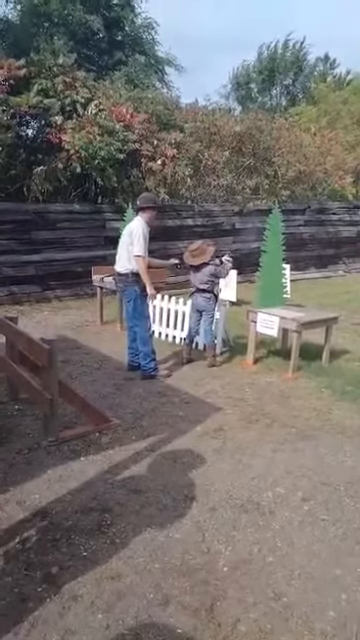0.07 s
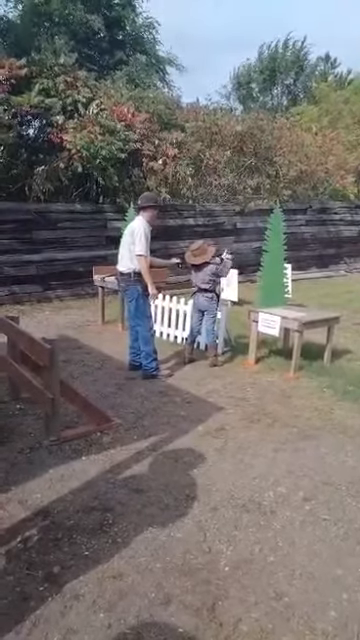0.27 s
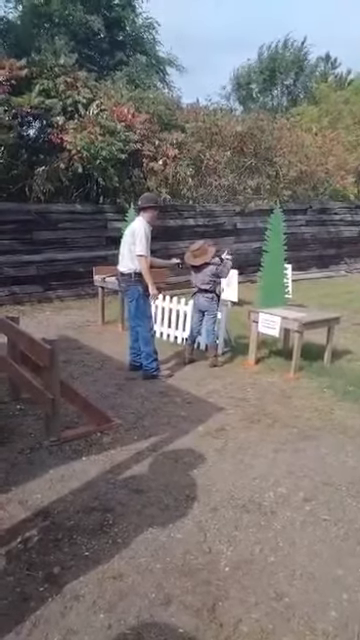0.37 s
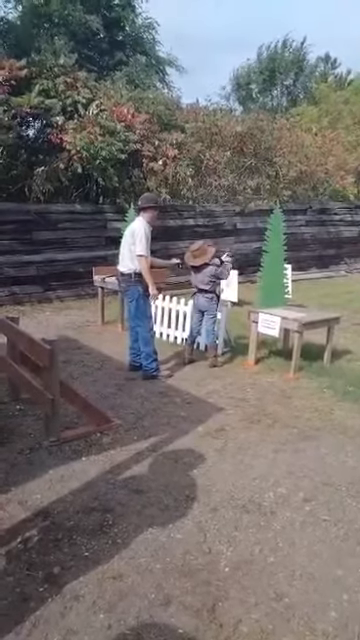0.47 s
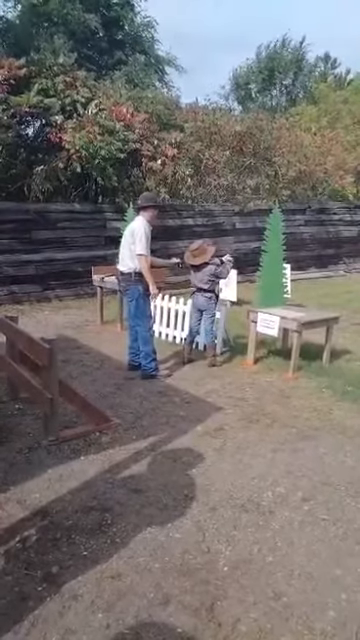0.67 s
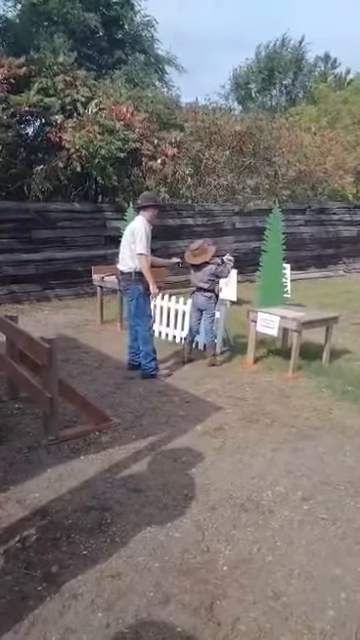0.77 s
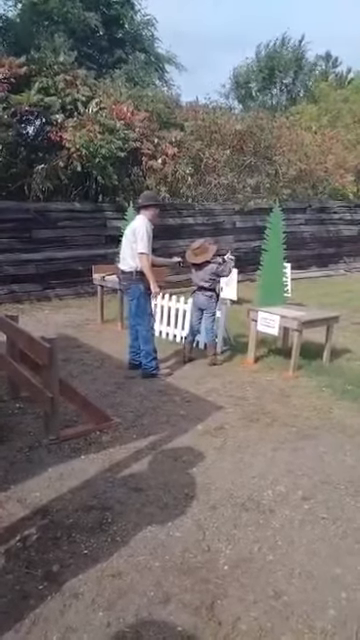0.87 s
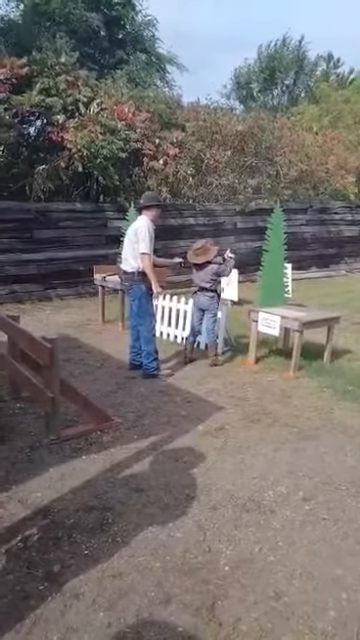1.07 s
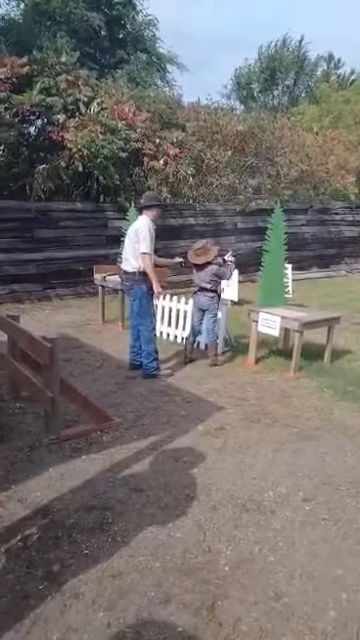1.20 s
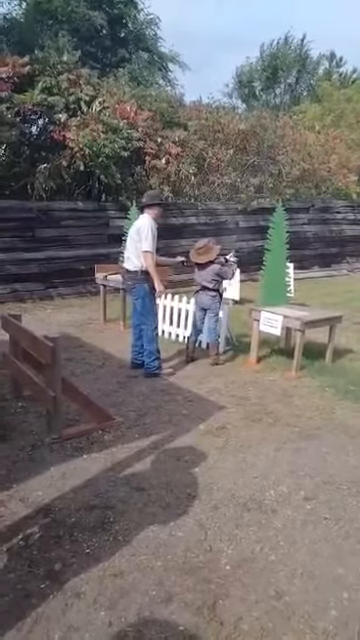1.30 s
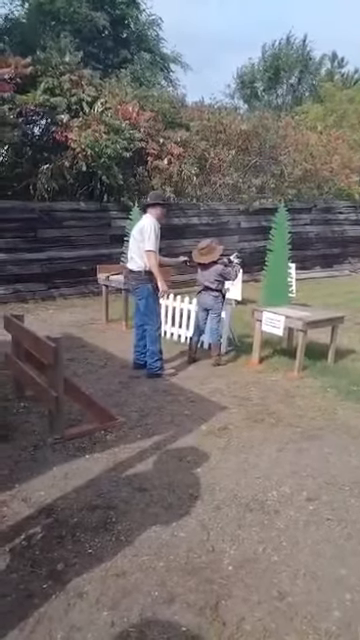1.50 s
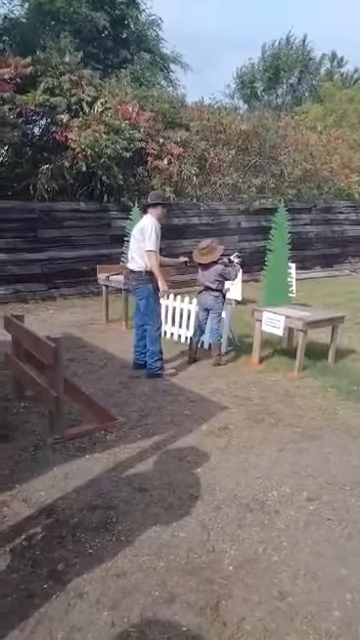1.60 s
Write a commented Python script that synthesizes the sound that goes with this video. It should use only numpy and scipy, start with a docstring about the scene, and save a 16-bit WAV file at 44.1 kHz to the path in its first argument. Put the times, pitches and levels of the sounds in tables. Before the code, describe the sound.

Revolver fires twice at an outdoor range, bullets ringing a steel plate, echoes rolling off quickly

```python
"""Two revolver shots at an outdoor range, heard from a few metres behind the shooter: shaped noise bursts.
Each blast slaps back from a timber wall, rolls away among fences and trees as grainy noise, and returns in dull booms.
Each bullet clangs a steel plate: a noise splash, decaying sine modes and a wash of close upper sines. The lowest
modes still sing from the hit before. The dying tail of an earlier shot, faint far-off reports and open air are
coloured noise. The loudest peaks overload the microphone."""
import sys
import numpy as np
from scipy import signal
from scipy.fft import rfft, irfft
from scipy.io import wavfile
from scipy.ndimage import uniform_filter1d

SR = 44100
rng = np.random.default_rng(int(sys.argv[2]) if len(sys.argv) > 2 else 0)


def waveform_to_disk(signal):
    """Save audio, clipped to [-1, 1], as 16-bit WAV at the path in sys.argv[1]."""
    frames = np.transpose(np.atleast_2d(signal))
    scaled = np.clip(frames, -1, 1) * 32767
    samples = np.round(scaled).astype(np.int16)
    wavfile.write(sys.argv[1], SR, samples)


N = 72765

# The two shots, with level offsets for each layer:
# (time [s], blast level [dB], reverberation and echo level [dB], plate splash and shimmer level [dB])
SHOT_TABLE = [(0.2116, 3, 1, 8.5), (0.9673, 3, 1, 5.5)]
FLIGHT_S = 0.019  # from the shot to its clang
RING_RISE_S = 0.022  # attack of the ringing steel


def undb(db):
    """Decibels to gain."""
    return 10 ** (np.asarray(db) / 20)


def along(points, hz):
    """Read (frequency [Hz], value) points on a log-frequency axis."""
    p = np.array(points, float)
    return np.interp(np.log(np.maximum(hz, 1)), np.log(p[:, 0]), p[:, 1])


def noise(spectrum, likeness):
    """Stereo noise of rms 1 with a given colour and likeness between the ears, growing alike in the bass."""
    bass_alike_hz = 90
    hz = np.fft.rfftfreq(N, 1 / SR)
    alike = np.clip(likeness, -1, 1)
    alike = alike + (1 - alike) / (1 + (hz / bass_alike_hz) ** 2)
    mid, side = rfft(rng.standard_normal((2, N)))
    common = np.sqrt(1 + alike) * mid
    opposed = np.sqrt(np.maximum(1 - alike, 0)) * side * np.array([[1], [-1]])
    y = irfft((common + opposed) * undb(along(spectrum, hz)), N)
    return y / y.std()


def walk(rate):
    """Smoothed random drift for each ear, spread 1; a higher rate [Hz] moves faster."""
    k = max(int(SR / rate), 1)
    y = uniform_filter1d(uniform_filter1d(rng.standard_normal((2, N)), k), k)
    return y / y.std()


def since(start):
    """Seconds since a moment."""
    return np.arange(N) / SR - start


def envelope(age, rise, hold, t60):
    """Straight attack, then exponential release from the end of the hold; all times from age zero [s]."""
    return np.clip(age / rise, 0, 1) * np.exp(-np.log(1000) * np.maximum(age - hold, 0) / t60)


def swell(age, width):
    """A bell-shaped bump around age zero."""
    return np.exp(-.5 * (age / width) ** 2)


def blasts():
    """The muzzle blast with its nearest reflections, then the dull slap of the wall; both shots take the same paths."""
    # Colour of the muzzle blast: (frequency [Hz], relative level [dB])
    blast_colour = [(25, 1.5), (60, -16), (130, 0), (330, -1.5), (530, 4.5), (670, 6), (950, -27.5),
                    (1200, 4.5), (1700, -1.5), (3000, -4.5), (4500, -13), (8000, -16), (10000, -23.5),
                    (13000, -41)]
    # Colour of the wall's reflection: (frequency [Hz], relative level [dB])
    wall_colour = [(30, -10), (150, -10), (400, -10), (530, -7.5), (640, -2.5), (780, -2), (920, 9.5),
                   (1200, -24), (2000, -24.5), (8000, -37)]
    # Levels ahead of each shot's own offset
    blast_db, blast_hold_s, blast_t60_s, blast_likeness = -8.5, 0.011, 0.12, 0.13
    wall_db, wall_delay_s, wall_width_s, wall_likeness = -7, 0.01785, 0.0024, 0.47

    age = since(0)
    crack = noise(blast_colour, blast_likeness) * envelope(age, 0.0017, blast_hold_s, blast_t60_s)
    slap = noise(wall_colour, wall_likeness) * swell(age - wall_delay_s, wall_width_s)
    shot = undb(blast_db) * crack + undb(wall_db) * slap
    out = 0
    for start, db, _, _ in SHOT_TABLE:
        placed = np.roll(shot, int(start * SR), axis=1) * (since(start) > 0)
        out = out + undb(db) * placed
    return out


def reverberation():
    """Dense, grainy scatter from fences and trees, each frequency band dying at its own rate."""
    # Colour of the scatter: (frequency [Hz], relative level [dB])
    tail_colour = [(25, -10), (60, -30.5), (140, -1.5), (280, 0.5), (450, -0.5), (800, 3), (1300, -4.5),
                   (2000, -4.5), (3100, -6.5), (4400, -14), (6000, -13), (8200, -14), (9200, -27),
                   (11200, -30.5), (12800, -35.5)]
    # Decay of the scatter: (band centre [Hz], time to fall 60 dB [s])
    tail_decay = [(40, .33), (150, 0.63), (400, .5), (900, 0.7), (2500, 0.61), (6000, 0.67), (12000, 0.37)]
    tail_db, rise_s, hold_s, likeness = -13.5, 0.0047, 0.064, 0.025  # level ahead of each shot's offset
    drop_db, drop_s = -5.5, 0.054  # the near reflections run out
    grain_db, grain_rate_hz = 1.5, 900  # single reflections stand out of the scatter
    cluster_db, cluster_rate_hz = 1.4, 210  # and they arrive in clusters

    scatter = rfft(noise(tail_colour, likeness))
    hz, out = np.fft.rfftfreq(N, 1 / SR), 0
    for centre, t60 in tail_decay:
        # Overlapping triangles on the log-frequency axis that add up to the whole scatter
        triangle = [(f, f == centre) for f, _ in tail_decay]
        band = irfft(scatter * along(triangle, hz), N)
        for start, _, db, _ in SHOT_TABLE:
            age = since(start)
            drop = drop_db * np.clip((age - hold_s) / drop_s, 0, 1)
            out = out + band * undb(tail_db + db + drop) * envelope(age, rise_s, hold_s, t60)
    return out * undb(grain_db * walk(grain_rate_hz) + cluster_db * walk(cluster_rate_hz))


def echoes():
    """Each shot comes back from the banks and trees as a few soft booms of band-shaped noise."""
    # Dull echoes: (delay [s], level before the shot's offset [dB], centre frequency [Hz])
    echo_paths = [(.108, -39, 100), (.11, -41, 800), (.178, -34, 155), (.165, -35, 850)]
    width_s, skirt_db = 0.013, -23  # skirt: fall per octave away from the centre
    out, octaves = 0, np.arange(-6, 7)
    for delay, echo_db, hz in echo_paths:
        colour = np.c_[hz * 2. ** octaves, skirt_db * abs(octaves)]
        boom = noise(colour, 0.9)
        for start, _, db, _ in SHOT_TABLE:
            out = out + boom * undb(db + echo_db) * swell(since(start + delay), width_s)
    return out


def plate():
    """Each bullet splashes on the steel and starts its modes afresh; scattered paths make high modes waver most."""
    # Colour of the bullet splash: (frequency [Hz], relative level [dB])
    splash_colour = [(500, -43), (3000, 17.5), (8000, -3), (10500, 4.5), (12800, -0.5)]
    # Modes of the steel plate: (frequency [Hz], time to fall 60 dB [s])
    plate_modes = [(613.8, 14), (665.5, 5), (953, 4), (1367.5, 1.4), (1473, .5), (2197, .5), (3031, .5),
                   (3067, .45), (3226, .4), (3757, .42), (4081, .45), (5858, .6), (6690, .55), (7092, .36),
                   (7919, .4), (8446, .42), (8829, .42), (9247, .32), (9925, .35), (12320, .28)]
    # Mode levels, one column per mode in that order (level [dB]); rows: still ringing at the start
    # (lowest modes only), first hit, second hit
    mode_levels = [
        [-46, -51.5, -45, -53.5],
        [-34.5, -50.5, -50, -34, -25.5, -19, -23.5, -36.5, -20.5, -46, -28, -41, -45.5, -44.5, -31, -26, -33,
         -38.5, -42, -39],
        [-41.5, -51.5, -59.5, -44, -58.5, -22, -36, -24, -44.5, -28, -27, -50, -31.5, -30.5, -20, -24.5, -52,
         -28.5, -53, -44],
    ]
    # Balance of each mode in that order: (left minus right [dB])
    mode_balance = [3.5, 6, -11.5, -3.5, -13.5, -3.5, -12.5, -11.5, -8.5, -7.5, -8.5, -23.5, -23.5, -28, 23,
                    18.5, -5, 5.5, -5.5, -30]
    splash_db, splash_t60_s = -25.5, 0.25  # level ahead of each shot's offset
    waver, waver_rate_hz = 0.19, 54  # waver depth at 3000 Hz and above

    hits = [start + FLIGHT_S for start, *_ in SHOT_TABLE]
    splash, out = noise(splash_colour, 0), 0
    for hit, (*_, db) in zip(hits, SHOT_TABLE):
        out = out + splash * undb(splash_db + db) * envelope(since(hit), 0.0026, 0, splash_t60_s)

    # The first ringing begins one rise early, so it is already sounding at time zero
    for hit, next_hit, levels in zip([-RING_RISE_S] + hits, hits + [np.inf], mode_levels):
        age = since(hit)
        choke = np.clip(-since(next_hit) / RING_RISE_S, 0, 1)  # old ringing fades out just before the next hit
        for (hz, t60), db, pan_db in zip(plate_modes, levels, mode_balance):
            height = min(hz / 3000, 1)
            paths = 1 + waver * height * (walk(waver_rate_hz) + 1j * walk(waver_rate_hz))
            balance = undb(np.array([[pan_db], [-pan_db]]) / 2)
            phase_spread = np.exp(.6j * height * np.array([[1], [-1]]))
            spin = np.exp(2j * np.pi * (hz * age + rng.random()))
            tone = (balance * phase_spread * paths * spin).imag
            # A sine of amplitude sqrt(2) has rms 1
            out = out + np.sqrt(2) * undb(db) * envelope(age, RING_RISE_S, 0, t60) * choke * tone
    return out


def shimmer():
    """A crowd of weak, close upper modes gives each hit its metallic wash."""
    shimmer_db, t60_s, low_hz, high_hz = -27, 0.49, 4905, 8100  # level ahead of each shot's offset
    t, crowd, struck = since(0), 0, 0
    for place, *phases in rng.random((60, 3)):
        hz = low_hz + (high_hz - low_hz) * place
        crowd = crowd + np.sin(2 * np.pi * (hz * t + np.array(phases)[:, None]))  # own phase at each ear
    for start, *_, db in SHOT_TABLE:
        struck = struck + undb(db) * envelope(since(start + FLIGHT_S), RING_RISE_S, 0, t60_s)
    return undb(shimmer_db) * struck * crowd / crowd.std()


def surroundings():
    """Dying tail of an earlier shot, then faint far-off reports, over gently shifting air: all coloured noise."""
    # Dying tail of an earlier shot (first row), then faint far-off reports:
    # (time [s], level [dB], rise [s], time to fall 60 dB [s])
    distant_swells = [(.0, -43.5, .02, 0.57), (.55, -53, .02, .35), (.652, -42, .016, .16),
                      (1.3, -37.5, 0.016, 0.13), (1.608, -42.5, 0.033, 0.46)]
    # Colour shared by that tail and the reports: (frequency [Hz], relative level [dB])
    distant_colour = [(100, -16), (400, -30), (800, -5.5), (1500, 12), (3000, 1.5), (7500, -10.5),
                      (9500, -25.5)]
    # Colour of the open air: (frequency [Hz], relative level [dB])
    air_colour = [(25, -35.5), (70, -23.5), (170, -1), (300, -8.5), (430, 2), (530, -4.5), (800, -1),
                  (1300, -10), (2200, -15), (3200, -16), (4500, -29.5), (8000, -26.5), (9500, -48.5),
                  (13000, -66)]
    air_db, air_likeness = -51, 0.56

    loudness = 0
    for start, db, rise, t60 in distant_swells:
        loudness = loudness + undb(db) * envelope(since(start), rise, 0, t60)
    distant = noise(distant_colour, 0.18) * loudness
    air = noise(air_colour, air_likeness) * undb(air_db + 0.64 * walk(24))
    return distant + air


def scene():
    """Shots, their echoes, the steel plate and the surroundings."""
    return blasts() + reverberation() + echoes() + plate() + shimmer() + surroundings()


def record(dry):
    """The microphone rounds the loudest peaks; the recorder cuts the top."""
    mic_ceiling, top_hz = 0.75, 13300
    rounded = mic_ceiling * np.tanh(dry / mic_ceiling)
    low_pass = signal.ellip(8, .2, 70, top_hz, fs=SR, output="sos")
    return signal.sosfilt(low_pass, rounded)


dry = scene()
out = record(dry)
waveform_to_disk(out)
```